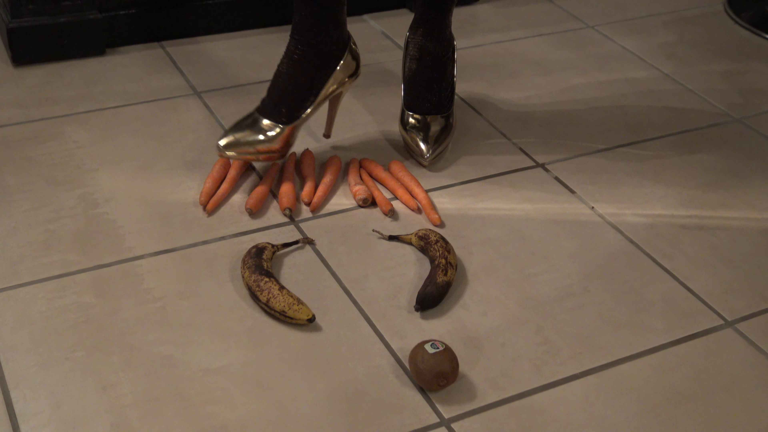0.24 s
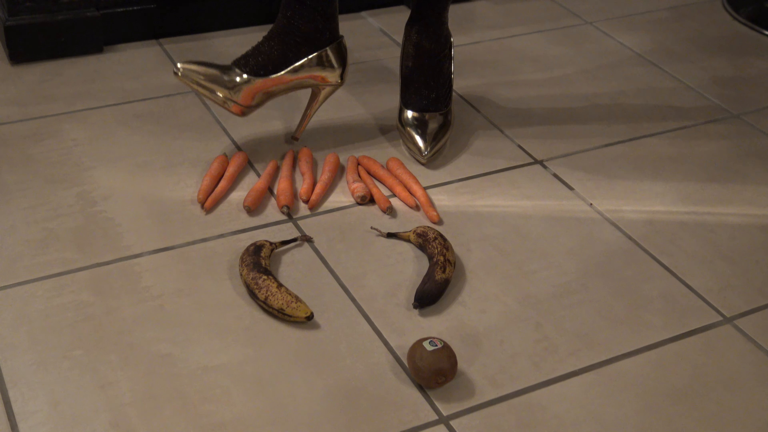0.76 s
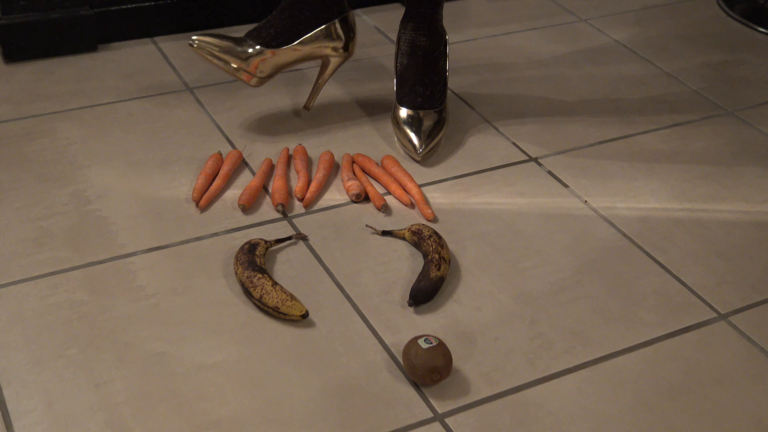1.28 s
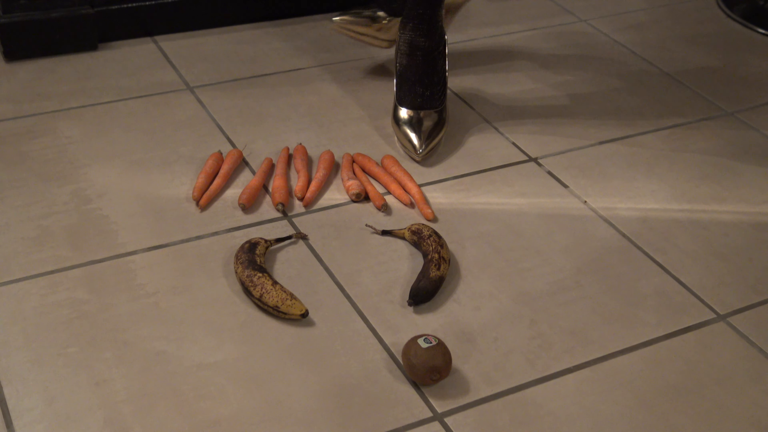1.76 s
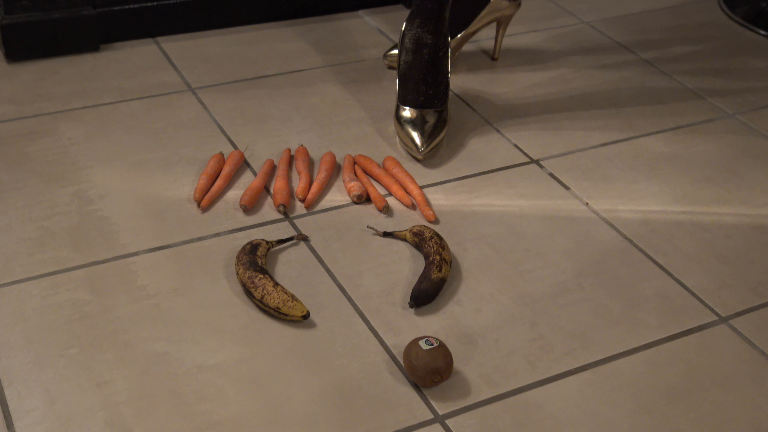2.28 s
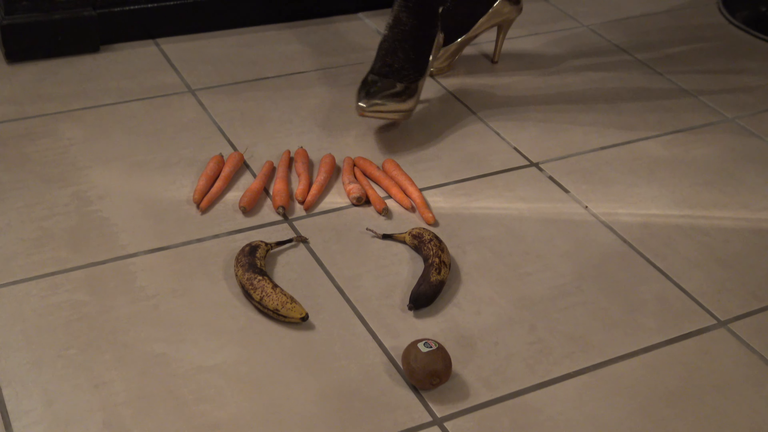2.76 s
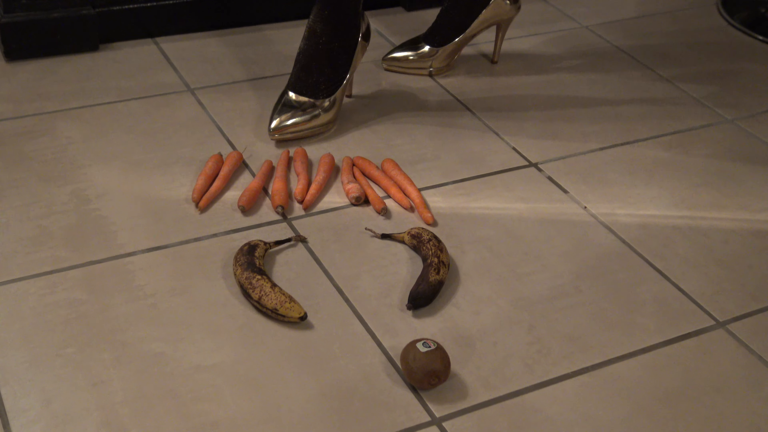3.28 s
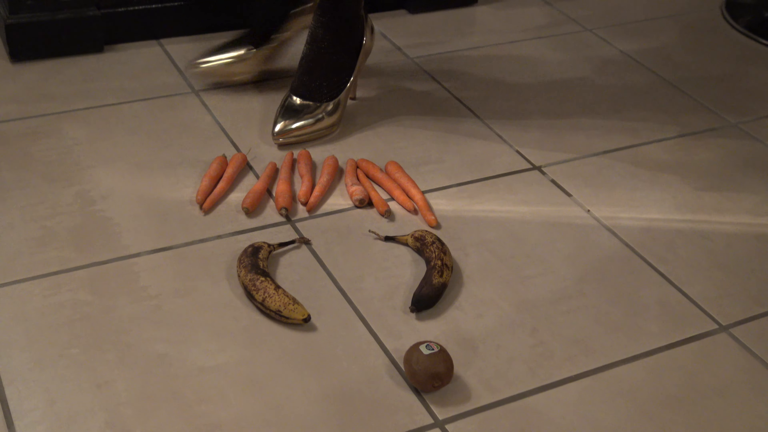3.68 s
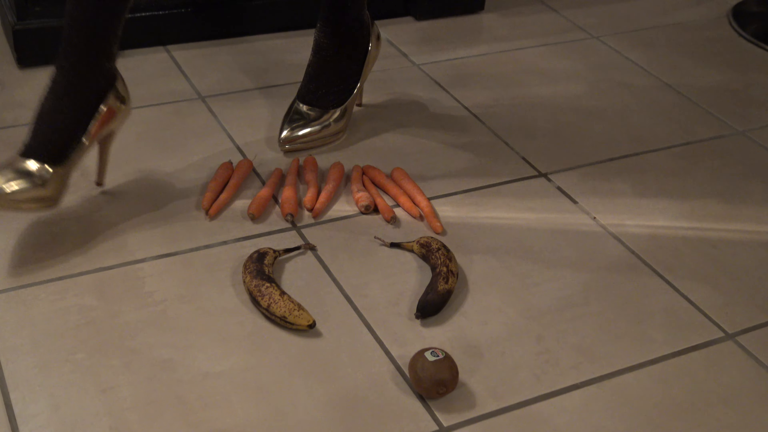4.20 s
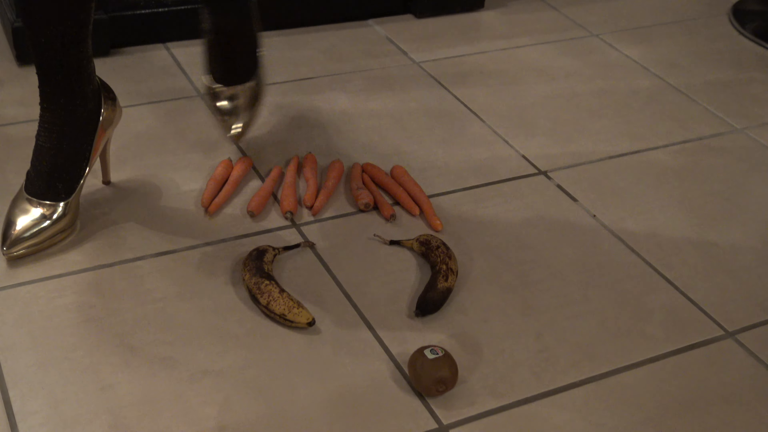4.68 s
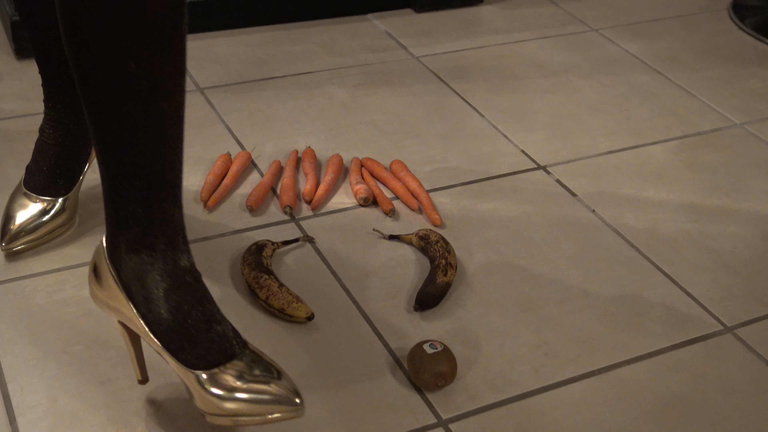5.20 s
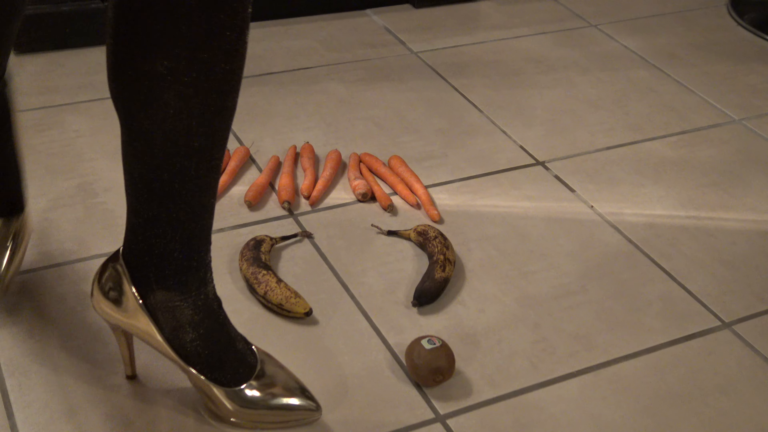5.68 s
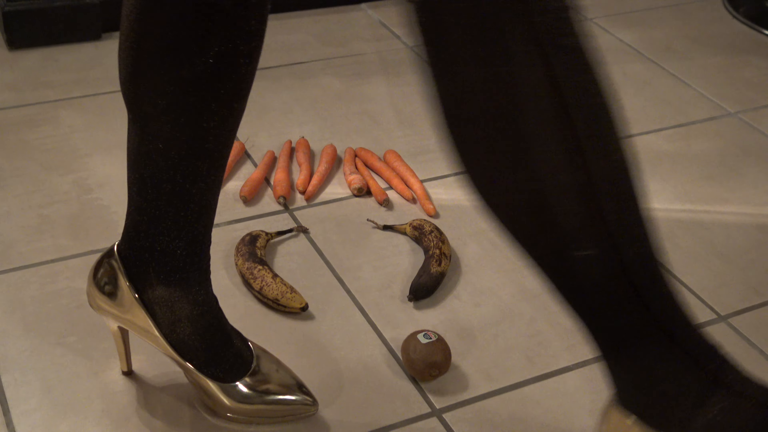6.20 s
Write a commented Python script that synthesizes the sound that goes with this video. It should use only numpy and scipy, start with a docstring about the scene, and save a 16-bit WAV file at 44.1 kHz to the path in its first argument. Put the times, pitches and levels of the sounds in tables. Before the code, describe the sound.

Stiletto heels step slowly across hard kitchen tiles, five sharp clacks about a second apart, with faint tights swishing and a low appliance hum.

```python
"""Stiletto heels on kitchen tiles

Stiletto heels step slowly and closely across a tiled floor. Each heel thumps (a swelling sine), clacks
(damped modes) and ticks (a scattered pulse); the sole follows more softly, and the hard room answers.
Tights swish between the steps as swells of coloured noise, and the shoes creak and squeak.
An appliance hums in wavering sines under faint room noise and hiss."""
import sys
import numpy as np
from scipy import signal
from scipy.fft import rfft, irfft, next_fast_len
from scipy.io import wavfile
from scipy.ndimage import map_coordinates

SR = 44100
rng = np.random.default_rng(int(sys.argv[2]) if len(sys.argv) > 2 else 0)


def unload_audio(sound):
    """Save the sound as a 16-bit wav file, at the path given as the first command line argument."""
    columns = np.transpose(np.atleast_2d(sound))
    # keep every value between -1 and 1, then stretch to whole-number steps
    steps = np.round(np.clip(columns, -1, 1) * 32767)
    wavfile.write(sys.argv[1], SR, steps.astype(np.int16))


N = 284445  # length in samples


def amp(db):
    """Decibels to gain."""
    return 10 ** (np.asarray(db) / 20)


def unit(x):
    """Scale to rms 1."""
    return x / np.sqrt(np.mean(x ** 2) + 1e-20)


def along(points, hz):
    """Read (Hz, value) points on a log frequency axis."""
    point_hz, values = np.transpose(points)
    return np.interp(np.log(hz + 1), np.log(point_hz + 1), values)


def wobble(rate):
    """A smooth random curve through normally distributed knots, rate of them a second."""
    knots = rng.standard_normal(int(N * rate / SR) + 4)
    return map_coordinates(knots, [np.arange(N) * rate / SR])


def noise(spectrum, size):
    """Noise of rms 1, coloured by shaping the spectrum of white noise."""
    m = next_fast_len(size + 8192)
    white = rfft(rng.standard_normal(m))
    colour = amp(along(spectrum, np.fft.rfftfreq(m, 1 / SR)))
    return unit(irfft(white * colour, m)[:size])


def stereo(mid, side, side_db):
    """Left and right from a common and a differing part."""
    difference = amp(side_db) * side
    return np.array([mid + difference, mid - difference])


def add(track, sound, s):
    """Mix a sound into the track at time s."""
    start = round(s * SR)
    track[:, start:start + sound.shape[1]] += sound[:, :max(N - start, 0)]


# Steady hum, then the appliance tones. Each row: frequency in Hz, level in dB rms (the tones waver around it).
HUM_TONES = [(100, -54), (172, -65), (200, -65.5), (258, -69), (300, -65), (348, -68.5), (680, -71.5),
             (980, -71)]
# Colour of the room noise. Each row: frequency in Hz, relative level in dB per Hz.
AIR_COLOUR = [(25, -2), (50, -12.5), (90, -8.5), (140, -6.5), (220, -9), (330, -5.5), (480, -11),
              (980, -12), (1450, -23), (3000, -28.5), (9000, -31), (13000, -34), (15800, -38)]
# Level of a thin electrical whine, wavering around this line. Each row: time in seconds, level in dB rms.
WHINE_LEVEL = [(0, -79), (2, -76.5), (3, -76), (6.45, -75)]


def background(air_db=-53.5, hiss_db=-73, whine_hz=2799):
    """Steady mains hum, wavering appliance tones, soft room noise and each microphone's own hiss."""
    t = np.arange(N) / SR
    (mains_hz, mains_db), *tones = HUM_TONES
    hum = amp(mains_db) * np.sin(2 * np.pi * mains_hz * t)
    for hz, db in tones:
        hum = hum + amp(db + wobble(3.1)) * np.sin(2 * np.pi * hz * t + wobble(10))
    whine_db = np.interp(t, *np.transpose(WHINE_LEVEL)) + wobble(29)
    whine = amp(whine_db) * np.sin(2 * np.pi * whine_hz * t + wobble(20))
    air = stereo(noise(AIR_COLOUR, N), noise(AIR_COLOUR, N), side_db=-14.0)
    hiss = amp(hiss_db) * rng.standard_normal((2, N))
    return np.sqrt(2) * (hum + whine) + amp(air_db) * air + hiss  # sqrt(2) turns sine rms into peak


# How long the room rings. Each row: frequency in Hz, 60 dB decay time in seconds.
ROOM_T60 = [(100, 0.77), (260, 0.38), (700, 0.37), (1800, 0.43), (5000, 0.49), (13000, 0.98)]
# Colour of the room's answer. Each row: frequency in Hz, relative level in dB.
ROOM_COLOUR = [(50, 3.5), (135, 1.5), (200, 4), (300, 3), (700, 0.5), (1500, 3.5), (5000, 4), (15000, -1)]
# The room's standing waves. Each row: frequency in Hz, level in dB relative to one another,
# 60 dB decay time in seconds.
STANDING_WAVES = [(177.2, -0.5, 0.26), (217.6, 8.5, 0.18), (265, 5, 0.21), (341, -6, 0.38),
                  (354.6, -14.5, 0.76), (429.4, -14.5, 0.34), (506.7, 3.5, 0.17), (561, -6, 0.33),
                  (577, 5, 0.1), (711, -1.5, 0.14), (960, -4, 0.43)]


def reverb(early_db=2, early_t60=0.24, gap=0.002, standing_db=-53):
    """One room tail: strong answers from near cupboards, then a diffuse decay with standing waves."""
    hz, t, z = signal.stft(noise(ROOM_COLOUR, SR // 2), SR, nperseg=256)
    decay = amp(-60 * t / along(ROOM_T60, hz)[:, None])
    tail = signal.istft(z * decay, SR, nperseg=256)[1]
    t = np.arange(len(tail)) / SR
    arrival = np.clip(t / gap - 1, 0, 1)  # silent for one gap in seconds, full after two
    tail = tail * (1 + amp(early_db - 60 * t / early_t60)) * arrival
    waves = 0
    for f, db, t60 in STANDING_WAVES:
        waves = waves + amp(db - 60 * t / t60) * np.sin(2 * np.pi * (f * t + rng.random()))
    return tail / np.linalg.norm(tail) + amp(standing_db) * waves * arrival


def in_room(sound, room_db, pan_db):
    """The direct sound and the room's answer, drawn afresh for every contact or creak."""
    response = amp(room_db) * stereo(reverb(), reverb(), side_db=-26)
    response[:, 0] += 1  # the direct sound
    pan = amp([[pan_db / 2], [-pan_db / 2]])
    return signal.fftconvolve(sound[None], response, axes=1) * pan


# The heel and its shank. Each row: frequency in Hz, relative level in dB (varied per strike),
# 60 dB decay time in seconds.
HEEL_MODES = [(796, 7.5, 0.0095), (1226, 3, 0.016), (1597, 7.5, 0.0049), (2120, 9, 0.0039),
              (2670, -6.5, 0.0027), (3040, -14, 0.002), (4930, -12, 0.011), (6800, -37, 0.0018)]


def heel_ring(t):
    """Damped modes of the heel, struck at new strengths each time."""
    out = 0
    for hz, db, t60 in HEEL_MODES:
        strength_db = db + 2 * rng.standard_normal()
        out = out + amp(strength_db - 60 * t / t60) * np.sin(2 * np.pi * hz * t)
    return out


# Small creaks and ticks of the shoes. Each row: start in seconds, level in dB before the heel and tip trims,
# length in seconds.
CREAKS = [(0.558, -41, 0.13), (1.376, -43, 0.028), (2.373, -36.5, 0.026), (2.4176, -34.5, 0.0071),
          (2.445, -38, 0.11), (2.556, -42.5, 0.13), (3.393, -42.5, 0.014), (3.916, -40.5, 0.15)]
# Colour of the heel tip on glaze, here and in every contact. Each row: frequency in Hz, relative level in dB.
TIP_COLOUR = [(200, -23), (1200, -29), (3000, 12.5), (6000, 3.5), (10000, 3), (13000, -1.5), (16000, -11)]
# A creak longer than a snap loses this much tick per doubling of its length; a shorter one gains it.
SNAP_S, DULLING_DB = 0.016, 4.2


def creaks(clack_db=-6, tick_db=-6, room_db=-3):
    """A short run of tiny slips shakes the heel as a shoe rocks or drags; slow ones are duller."""
    out, t = np.zeros((2, N)), np.arange(SR // 6) / SR
    for s, db, length in CREAKS:
        fade = np.exp(-2 * t / length)
        slips = rng.standard_normal(len(t)) ** 3 * fade  # cubing leaves a few strong slips
        heel = signal.fftconvolve(slips / np.linalg.norm(slips), heel_ring(t))[:len(t)]
        tip_db = tick_db - DULLING_DB * np.log2(length / SNAP_S)
        tip = amp(tip_db) * fade * noise(TIP_COLOUR, len(t))
        creak = amp(db) * (amp(clack_db) * heel + tip)
        add(out, in_room(creak, room_db, pan_db=-0.5), s)
    return out


# The legs brush past each other. Each row: peak time in seconds, level in dB before the flutter,
# rise in seconds, fall in seconds, brightness in dB per octave.
SWISHES = [(.88, -61.5, 0.21, 0.2, -1), (2.442, -53, 0.14, 0.12, -0.5), (2.82, -50.5, 0.073, 0.19, -0.5),
           (3.045, -52.5, 0.14, 0.041, -0.5), (3.479, -43, 0.058, 0.12, -1), (3.73, -55, 0.081, 0.074, -2),
           (4.08, -52.5, 0.13, 0.077, 2), (4.441, -49.5, 0.029, 0.048, 4), (4.67, -52.5, 0.33, 0.45, -2),
           (5.735, -42.5, 0.18, 0.06, -0.5), (5.9, -52.5, 0.073, 0.11, -1.5),
           (6.15, -49.5, 0.075, 0.15, -1.5)]
# Colour of nylon on nylon before each stroke's tilt. Each row: frequency in Hz, relative level in dB per Hz.
NYLON_COLOUR = [(700, -12), (1500, -9), (2700, -6), (4600, -2.5), (6000, -1.5), (8000, 0.5), (10500, -2.5),
                (13300, -4.5), (15800, -10)]
SWISH_SHAPE = 1.17  # 1 = a pointed swell, 2 = a rounded one


def tights(pivot_hz=7000):
    """Nylon slides on nylon as the legs move: each stroke swells to a peak and fades, with a flutter."""
    lead = .5  # seconds before the peak
    out, t = np.zeros((2, N)), np.arange(2 * SR) / SR - lead
    for s, db, rise, fall, tilt in SWISHES:
        colour = [(hz, level + tilt * np.log2(hz / pivot_hz)) for hz, level in NYLON_COLOUR]
        side_s = np.where(t < 0, rise, fall)
        stroke = np.exp(-np.abs(t / side_s) ** SWISH_SHAPE)
        fibres = stereo(noise(colour, len(t)), noise(colour, len(t)), side_db=-18.0)
        add(out, amp(db) * stroke * fibres, s - lead)
    flutter = amp(.5 * wobble(90))
    return out * flutter


def click(spectrum, size, spread):
    """A causal pulse of energy 1; its frequencies arrive scattered over spread seconds."""
    hz = np.fft.rfftfreq(size, 1 / SR)
    # folding the cepstrum gives the colour its minimum phase
    cepstrum = irfft(np.log(amp(along(spectrum, hz))), size)
    cepstrum[1:size // 2] *= 2
    cepstrum[size // 2 + 1:] = 0
    knots = np.linspace(0, SR / 2, 48)
    delay = spread * np.interp(hz, knots, rng.random(len(knots)) ** 2)  # squaring favours early arrivals
    phase = 2 * np.pi * np.cumsum(delay) * hz[1]
    pulse = irfft(np.exp(rfft(cepstrum) - 1j * phase), size)
    return pulse / np.linalg.norm(pulse)


def contact(thump_db, hz, rise, clack_db=-np.inf, tick_db=-np.inf, lowest_hz=130):
    """A shoe meets the tile: a tick of the tip, a clack of the heel and a thump as the weight arrives."""
    t = np.arange(2048) / SR
    load = (t / rise * np.exp(1 - t / rise)) ** 2  # the weight peaks rise seconds after the tip touches
    thump = -amp(thump_db) * load * np.sin(2 * np.pi * hz * t)
    heel = amp(clack_db) * heel_ring(t)
    tip = amp(tick_db) * click(TIP_COLOUR, len(t), spread=0.00318)
    # a small shoe radiates little bass
    small_shoe = signal.butter(1, lowest_hz, "highpass", fs=SR, output="sos")
    return signal.sosfilt(small_shoe, thump + heel + tip)


# Heel strikes. Each row: start in seconds, thump in dB, thump in Hz, clack and tick in dB before their trims,
# settling contact in dB below the strike, its thump in Hz, room in dB (for the strike), left-right in dB.
HEEL_STRIKES = [ (2.0720, -5, 648, -26.5, -20.5, 7.5, 316, 4, 0),
                (3.1595, -12.5, 604, -29, -27.5, 4, 270, -1.5, 1),
                (4.2723, -12, 298, -21, -30.5, 6, 744, 2.5, 0.5),
                (5.3257, -8.5, 344, -26, -29.5, 11.5, 516, 0, 1),
                (6.3906, -9, 328, -16, -21.5, 20, 517, -1.5, -1)]
HEEL_RISE_S = 0.0014  # how fast the weight builds on a heel
SETTLE_S, SETTLE_ROOM_DB = 0.007, 2  # a heel rocks and seats itself this much later, with more of the room
SETTLE_TICK_DB = -3  # the tip is already on the tile, so it ticks less


def heels(clack_trim_db=-6, tick_trim_db=9):
    """Each heel strikes and seats itself a moment later."""
    out = np.zeros((2, N))
    for s, thump, hz, clack, tick, softer, settle_hz, room_db, pan_db in HEEL_STRIKES:
        clack_db, tick_db = clack + clack_trim_db, tick + tick_trim_db
        strike = contact(thump, hz, HEEL_RISE_S, clack_db, tick_db)
        settle = contact(thump, settle_hz, HEEL_RISE_S, clack_db, tick_db + SETTLE_TICK_DB)
        add(out, in_room(strike, room_db, pan_db), s)
        add(out, in_room(amp(-softer) * settle, room_db + SETTLE_ROOM_DB, pan_db), s + SETTLE_S)
    return out


# The sole comes down. Each row: start in seconds, thump in dB (for the ball of the foot), thump in Hz.
SOLE_SLAPS = [(2.0890, -16.5, 520), (3.271, -23.5, 600), (4.382, -22.5, 696), (5.3853, -27, 550)]
SOLE_RISE_S, SOLE_ROOM_DB = 0.00091, 8
SOLE_CLACK_DB, SOLE_TICK_DB = -23.5, -13  # relative to the thump
TOE_S, TOE_DB = 0.024, -9.5  # the toe follows the ball of the foot, softer
TOE_OFF_AT, TOE_OFF_DB, TOE_OFF_HZ = 6.294, -33.5, 360  # one dull tap as the standing shoe rocks forward


def soles(pan_db=-1.0, rock_clack_db=-30):
    """The ball of the foot slaps down, then the toe; a shoe that only rocks forward taps once, dully."""
    out = np.zeros((2, N))
    for s, ball_db, hz in SOLE_SLAPS:
        for delay, db in [(0, ball_db), (TOE_S, ball_db + TOE_DB)]:
            slap = contact(db, hz, SOLE_RISE_S, db + SOLE_CLACK_DB, db + SOLE_TICK_DB)
            add(out, in_room(slap, SOLE_ROOM_DB, pan_db), s + delay)
    tap = contact(TOE_OFF_DB, TOE_OFF_HZ, SOLE_RISE_S, TOE_OFF_DB + rock_clack_db)
    add(out, in_room(tap, SOLE_ROOM_DB, pan_db), TOE_OFF_AT)
    return out


def squeak(peak_s=2.578, hz=910, level_db=-50, length=0.029):
    """A twisting sole gives a brief, unsteady stick-slip tone."""
    t = np.arange(N) / SR
    swell = np.exp(-((t - peak_s) / length) ** 2)
    tone = np.sin(2 * np.pi * hz * t + 0.45 * wobble(130))
    return amp(level_db) * swell * tone


# The floor takes the full weight. Each entry: start in seconds.
WEIGHT_TIMES = [3.437, 5.602]
WEIGHT_DB, WEIGHT_HZ, WEIGHT_RISE_S = -41.5, 121, 0.0064


def weight(room_db=3):
    """A soft, low thud as the body moves onto the front foot."""
    out = np.zeros((2, N))
    for s in WEIGHT_TIMES:
        thud = contact(WEIGHT_DB, WEIGHT_HZ, WEIGHT_RISE_S)
        add(out, in_room(thud, room_db, pan_db=0), s)
    return out


def scene():
    """Shoes, tights and the room."""
    return background() + creaks() + tights() + heels() + soles() + squeak() + weight()


# Balance of the two microphones. Each row: frequency in Hz, left minus right in dB.
BALANCE = [(110, 0.5), (200, 1.3), (380, 2.5), (700, 3.5), (1300, 1), (4400, -0.2), (15000, 1.5)]
TOP_HZ = 15850  # band limit


def record(dry):
    """Two microphones thin the deep bass, favour the left in the low middle and stop at a band limit."""
    thin = signal.sosfilt(signal.butter(2, 55, "highpass", fs=SR, output="sos"), dry)
    m = next_fast_len(N + SR // 2)
    hz = np.fft.rfftfreq(m, 1 / SR)
    gains = amp(np.outer([.5, -.5], along(BALANCE, hz)))
    return irfft(rfft(thin, m) * gains * (hz < TOP_HZ), m)[:, :N]


dry = scene()
out = record(dry)
unload_audio(out)
```